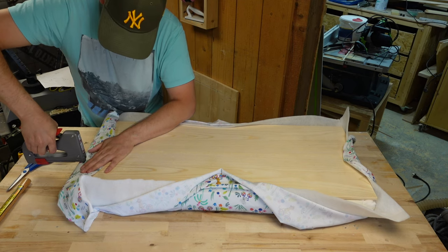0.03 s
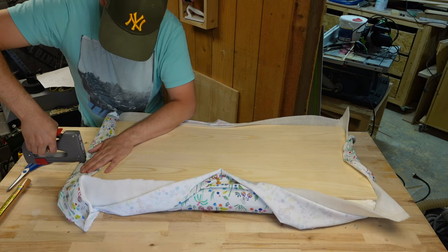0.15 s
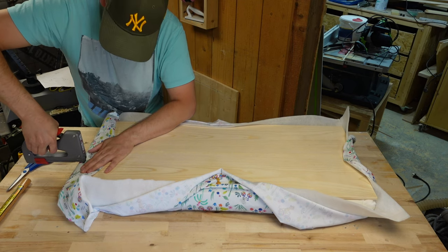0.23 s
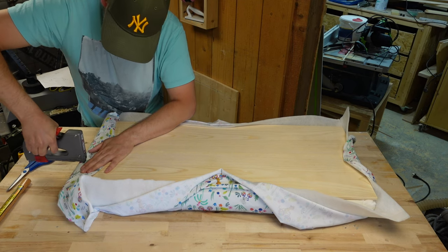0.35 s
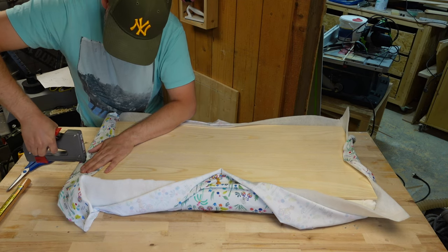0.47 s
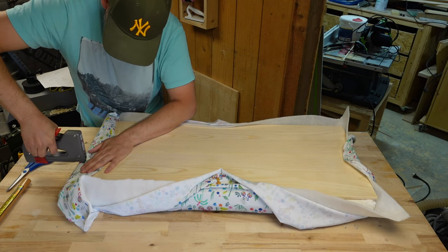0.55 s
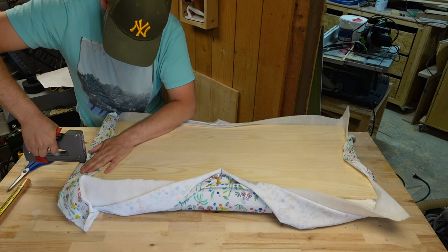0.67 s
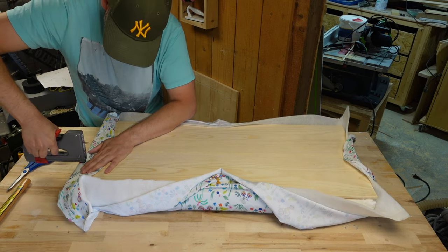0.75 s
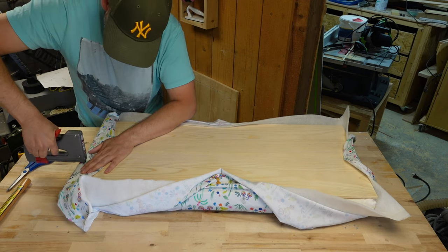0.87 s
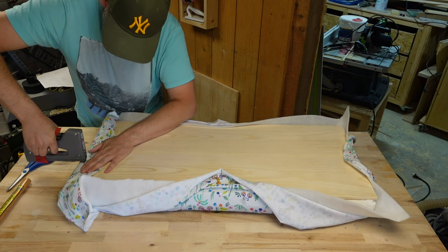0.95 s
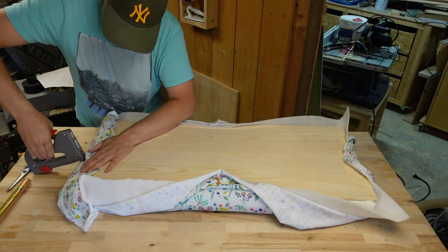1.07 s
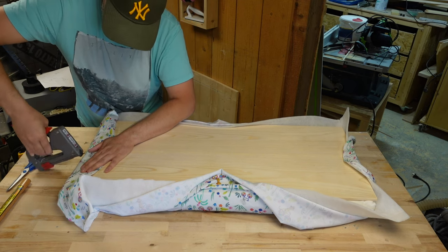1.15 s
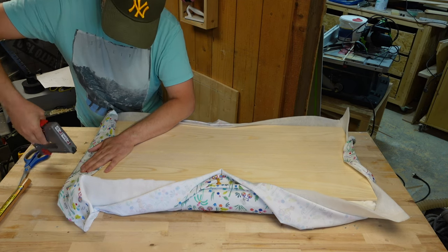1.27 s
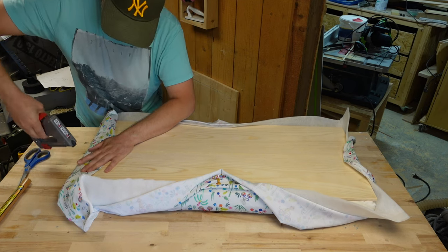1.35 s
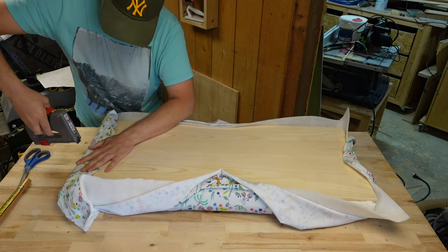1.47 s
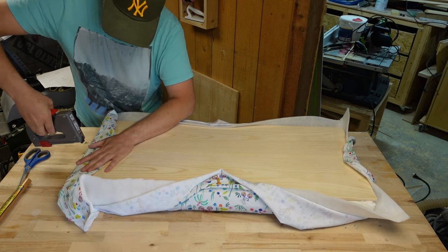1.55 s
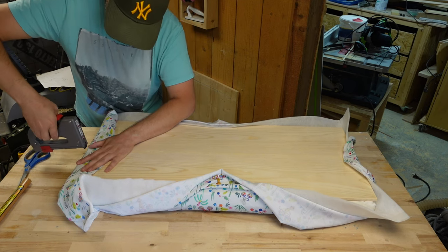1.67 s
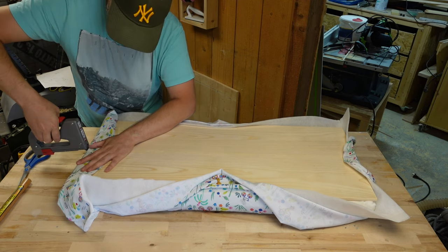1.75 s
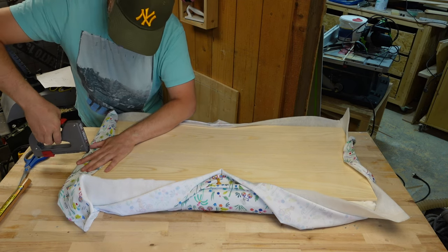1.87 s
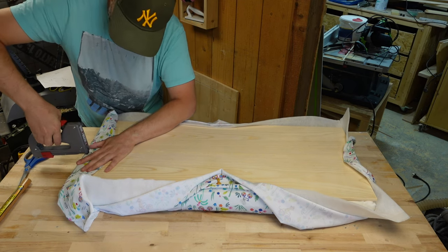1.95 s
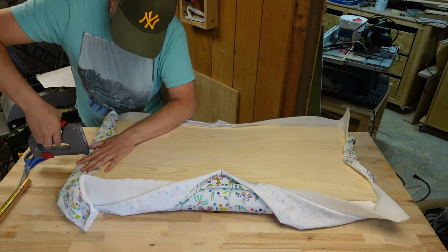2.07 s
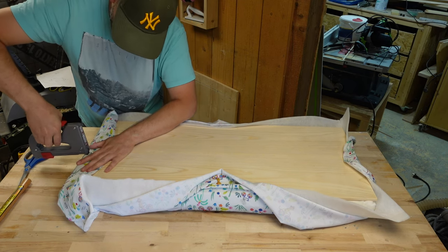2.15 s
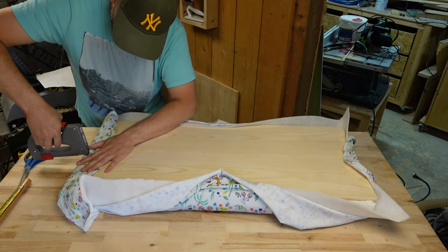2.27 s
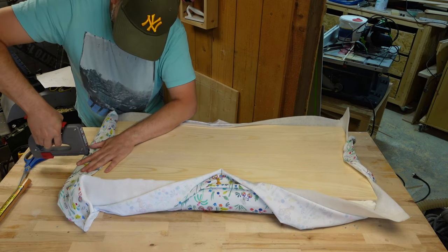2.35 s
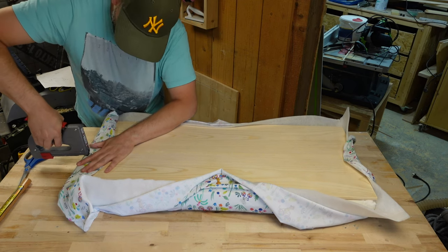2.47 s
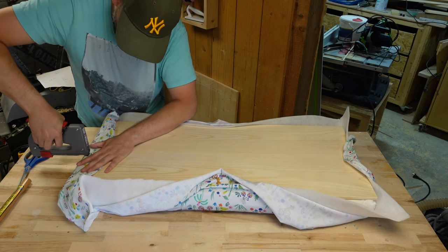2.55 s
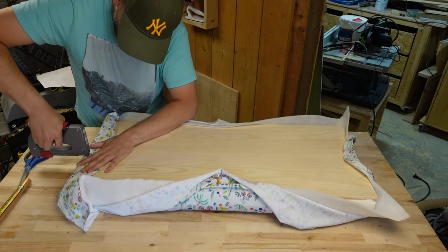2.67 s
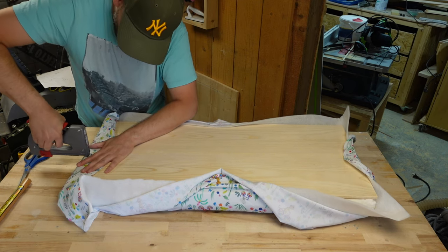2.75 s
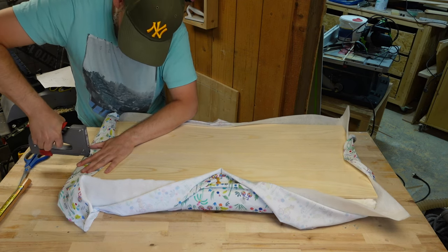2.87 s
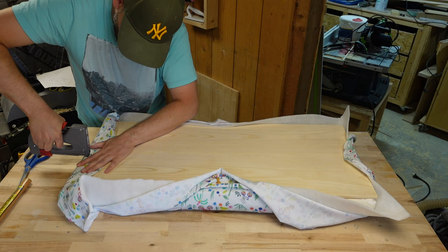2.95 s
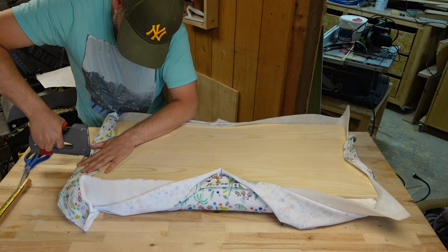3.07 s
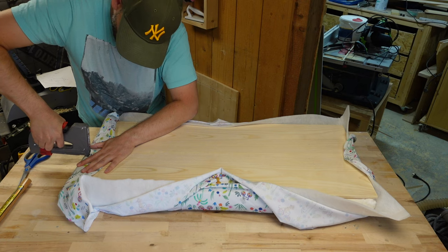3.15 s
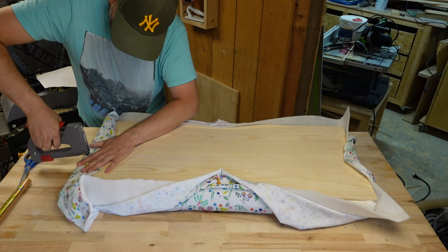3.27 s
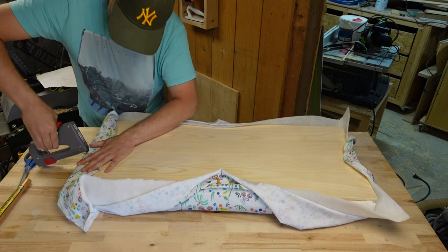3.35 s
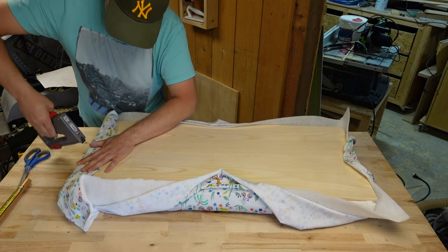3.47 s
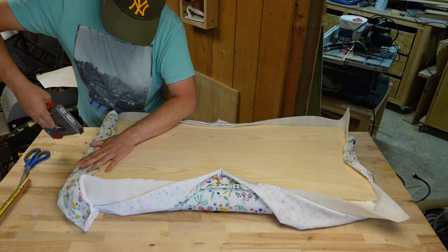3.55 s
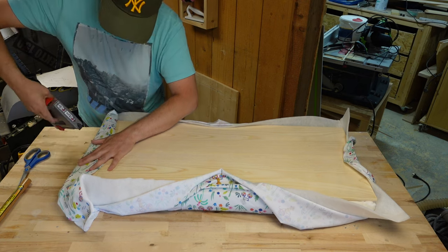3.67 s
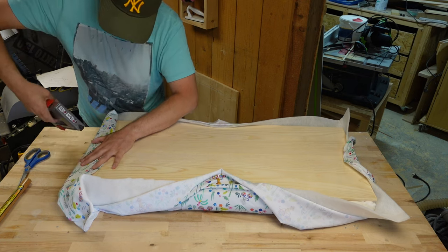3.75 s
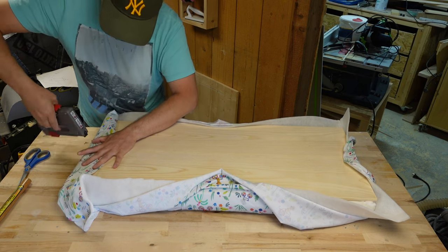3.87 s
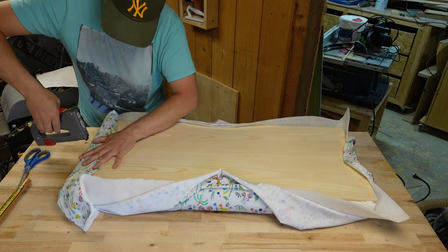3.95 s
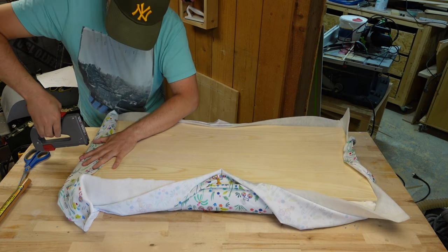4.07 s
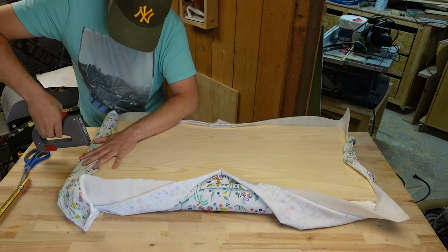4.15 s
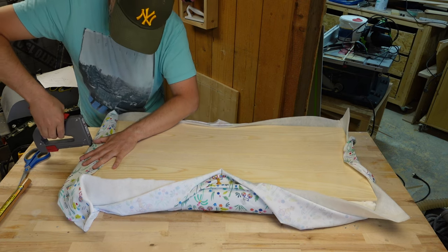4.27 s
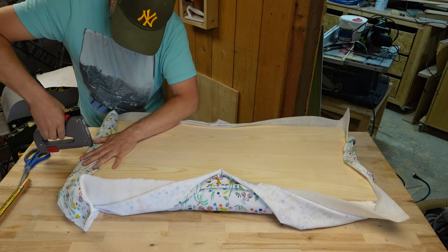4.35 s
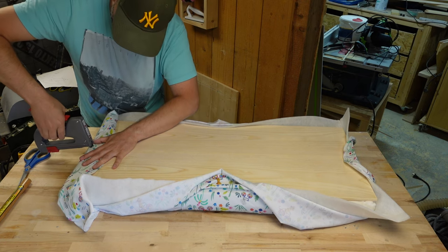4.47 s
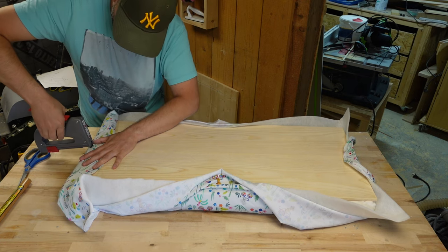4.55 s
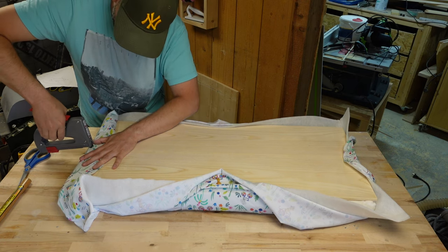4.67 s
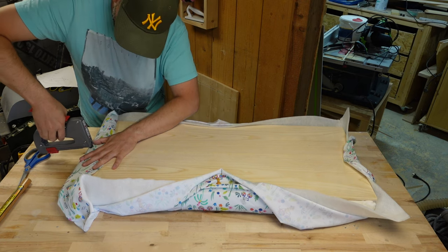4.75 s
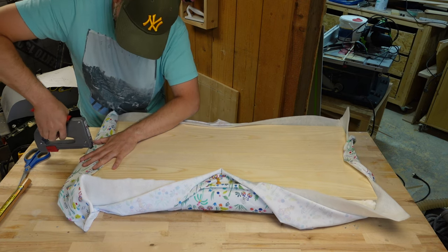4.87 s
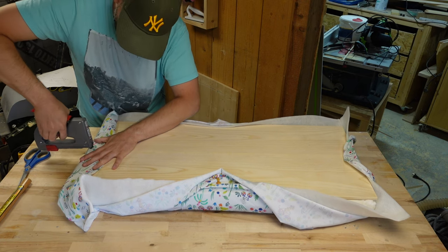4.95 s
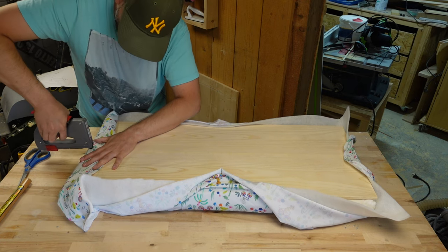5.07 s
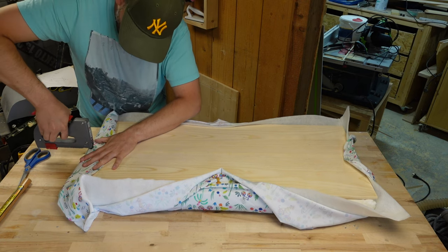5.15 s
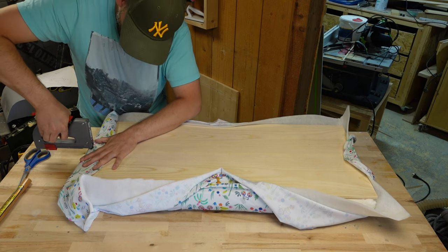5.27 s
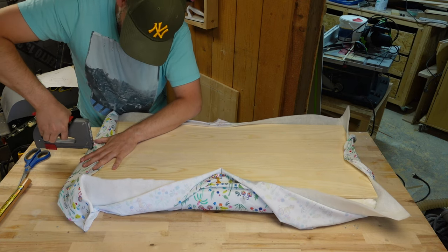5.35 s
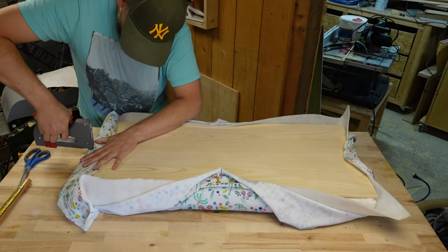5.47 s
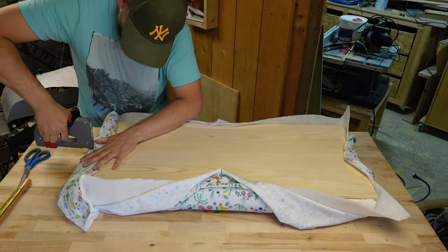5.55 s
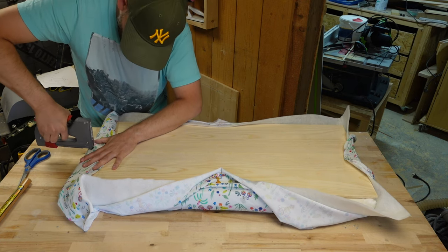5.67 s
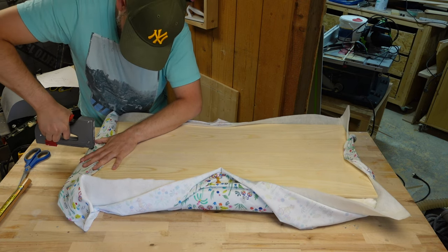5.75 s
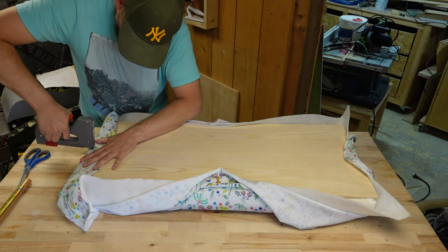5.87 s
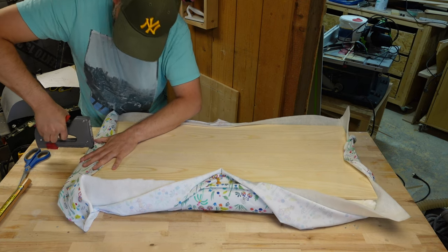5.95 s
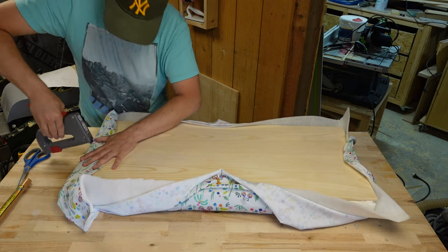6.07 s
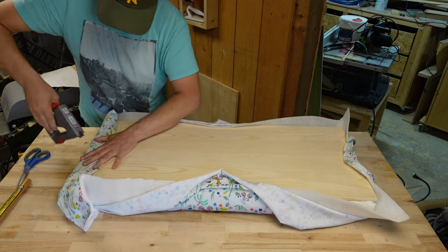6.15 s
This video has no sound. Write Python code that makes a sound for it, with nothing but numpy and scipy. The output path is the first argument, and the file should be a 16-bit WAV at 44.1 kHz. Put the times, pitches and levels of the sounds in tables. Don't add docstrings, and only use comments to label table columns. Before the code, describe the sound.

Three loud, punchy staple gun shots on a wooden board, with lever ticks, steel rattle and faint cloth rustle in a small workshop.

```python
import sys
import numpy as np
from scipy import signal
from scipy.io import wavfile
from scipy.ndimage import uniform_filter1d, minimum_filter1d

SR = 44100
rng = np.random.default_rng(int(sys.argv[2]) if len(sys.argv) > 2 else 0)


def output_pcm(signal):
    pcm = np.clip(np.atleast_2d(signal).T, -1, 1) * 32767
    wavfile.write(sys.argv[1], SR, np.round(pcm).astype(np.int16))


def how_loud(loudness_db):
    steps = np.asarray(loudness_db, float) / 20
    return 10 ** steps


N = 274302

# (frequency [Hz], left-right likeness [0-1])
ALIKE = [(100, 1), (400, 0.98), (1000, 0.93), (4000, 0.9), (14000, 0.82)]
# (frequency [Hz], level [dB per Hz])
CLOTH = [(300, -30.5), (600, -6), (1000, 2), (2200, 0.5), (4000, -2.5), (6000, -1), (9000, -9),
         (12000, -13.5), (15000, -28), (16500, -47.5)]
# (frequency [Hz], level [dB per Hz])
THUD_TONE = [(15, -65), (25, -44), (230, -3.5), (413, -7.5), (496, -15), (607, -8.5), (800, -14.5),
             (860, -10), (1050, -13), (2000, -32.5), (2600, -25.5), (4400, -120)]
# (frequency [Hz], width [Hz], level [dB])
BOARD = [(126.6, 14, 13.5), (156, 30, 5), (212, 36, 11), (313, 22, 7.5), (399.4, 17, 3), (417.8, 9.8, 1),
         (550, 90, 7.5), (613, 24, -3.5), (760, 32, 4.5), (937.6, 11, -2.5)]
# (time [s], blow [dB], change per rebound [dB], brightness [dB per octave])
LANDINGS = [
    (1.052, 8.5, -7.5, 4),
    (3.333, 0, -4.5, -2),
    (6.030, 2.5, -4, 5),
]


def evened(x):
    return x / np.sqrt(np.mean(x ** 2) + 1e-20)


def read(points, hz):
    f, value = np.transpose(points)
    return np.interp(np.log(hz + 1), np.log(f + 1), value)


def body(tone, modes, ring_db=0., tilt_db=0., size=8192):
    hz = np.abs(np.fft.fftfreq(size, 1 / SR))
    db = read(tone, hz)
    for f, width, gain_db in modes:
        db = db + max(ring_db + gain_db, 0) / (1 + (2 * (hz - f) / width) ** 2)
    db = db + tilt_db * np.log2(np.clip(hz, 500, 16000) / 3000)
    log_gain = np.maximum(db, -100) * np.log(10) / 20
    spectrum = np.exp(np.conj(signal.hilbert(log_gain)))
    response = np.fft.ifft(spectrum).real[:size // 2]
    return response / np.linalg.norm(response)


def add(mix, s, peak_db, response, rise_s, fall_s):
    t = np.arange(len(response)) / SR
    scrape = rng.standard_normal(len(t)) * (1 - np.exp(-t / rise_s)) * np.exp(-t / fall_s)
    direct = signal.fftconvolve(scrape / np.linalg.norm(scrape), response)[:len(t)]
    part = mix[:, round(s * SR):][:, :len(t)]
    part += how_loud(peak_db + 14.5) * np.array([direct, response])[:, :part.shape[1]]


def noise(tone, alike, patchy_db, size=512):
    frames, hz = 4 * N // size + 5, np.fft.rfftfreq(size, 1 / SR)
    a, b, c, d, patches = rng.standard_normal((frames, len(hz), 5)).T
    patches = uniform_filter1d(patches, size=9, axis=0)
    patches = evened(uniform_filter1d(patches, size=9, axis=1))
    same = np.clip(read(alike, hz), 0, 1)[:, None]
    left = a + 1j * b
    right = same * left + np.sqrt(1 - same ** 2) * (c + 1j * d)
    z = np.array([left, right]) * how_loud(read(tone, hz)[:, None] + patchy_db * patches)
    return evened(signal.istft(z, nperseg=size, noverlap=3 * size // 4)[1][:, :N])


def still_air():
    # (frequency [Hz], level [dB per Hz])
    air_tone = [(15, -78), (25, -21), (43, -20.5), (159, 2.5), (245, 3.5), (584, -2), (854, 2.5),
                (1150, -4), (1550, -0.5), (2530, -6.5), (13600, -25.5), (15200, -24.5), (16500, -34)]
    # (frequency [Hz], left-right likeness [0-1])
    air_alike = [(60, 0.38), (180, 0.3), (550, 0.29), (1650, 0.15), (4970, 0.36), (15000, 0.78)]
    return how_loud(-60.5) * noise(air_tone, air_alike, 1.4, size=1024)


def shop(x):
    # (frequency [Hz], reverberation time T60 [s])
    decay = [(100, 0.46), (250, 0.24), (600, 0.31), (1500, 0.24), (3000, 0.23), (6000, 0.21), (10000, .2),
             (13000, 0.17), (16000, .17)]
    builds_s = 0.0015
    white = [(20, 0), (20000, 0.01)]
    tail = noise(white, ALIKE, 3.9, size=256)[:, :SR]
    hz, t, z = signal.stft(tail, SR, nperseg=256)
    power = uniform_filter1d(abs(z[0]) ** 2, size=13, axis=0)
    z = z / np.sqrt(uniform_filter1d(power, size=5, axis=1))
    fade = how_loud(-60 * t / read(decay, hz)[:, None])
    tail = signal.istft(z * fade, SR, nperseg=256)[1][:, :SR]
    tail = tail * (1 - np.exp(-np.arange(SR) / SR / builds_s))
    return signal.fftconvolve(x[None], tail / np.linalg.norm(tail[0]), axes=1)[:, :N]


def handling():
    # (time [s], effort [dB])
    effort = [(0.0, -64), (1.3, -68), (1.44, -56.5), (1.69, -72.5), (2.0, -75.5), (2.328, -68.5),
              (2.501, -55.5), (2.6, -65), (3.01, -55), (3.6, -65), (3.66, -49.5), (3.82, -61), (4.211, -79),
              (4.85, -72), (4.98, -52.5), (5.05, -63), (5.16, -53), (5.53, -64.5)]
    # (frequency [Hz], level [dB per Hz])
    rumble_tone = [(40, -36.5), (100, -12.5), (200, 5.5), (350, 0.5), (800, -12.5)]
    slips_per_s, grain_s = 120, .0012
    busy_db, rumble_db, rumble_share = -60.5, -62, .6
    effort_db = np.interp(np.arange(N) / SR, *np.transpose(effort))
    slips = how_loud(2.5 * np.minimum(rng.exponential(1, N), 2.)) * (rng.random(N) < slips_per_s / SR)
    grain = 1.3 + signal.lfilter([1], [1, -np.exp(-1 / (grain_s * SR))], slips)
    cloth = evened(grain * noise(CLOTH, ALIKE, 3.5, size=256)) * how_loud(effort_db)
    bench_db = rumble_db + rumble_share * (effort_db - busy_db)
    return cloth + noise(rumble_tone, ALIKE, 3.0, size=2048) * how_loud(bench_db)


def foot():
    # (time [s], peak [dB], ring [Hz], fade [s])
    scuffs = [(0.298, -49, 2340, 0.017), (2.236, -62.5, 5700, 0.07), (2.328, -53.5, 2120, 0.039),
              (2.336, -60, 5770, 0.031), (2.585, -57, 5270, .05), (2.65, -60.5, 3920, 0.092),
              (2.777, -48, 5400, 0.021), (3.0135, -39, 2140, 0.0039), (5.73, -48, 2200, 0.0041),
              (5.975, -44, 1480, 0.017)]
    out = np.zeros((2, N))
    for s, db, hz, fade_s in scuffs:
        add(out, s, db + 18.5, body(CLOTH, [(hz, 0.37 * hz, 18)]), .004, fade_s)
    return out[0]


def ticks():
    # (frequency [Hz], level [dB per Hz])
    tick_tone = [(180, -47.5), (300, -35.5), (820, -18), (1110, -3), (1930, -5.5), (2440, -1.5), (3470, -6),
                 (5830, -6.5), (13500, -26), (16500, -42.5)]
    # (frequency [Hz], level [dB per Hz])
    knock_tone = [(25, -25), (60, -8), (120, -6), (230, -2), (400, -5.5), (550, -1), (800, -3.5),
                  (1200, -13), (3000, -59.5)]
    # (frequency [Hz], width [Hz], level added to the ring [dB])
    spring = [(5820, 420, 0), (9100, 650, -1.5)]
    # (time [s], peak [dB], own ring [Hz], brightness [dB per octave])
    spring_ticks = [(0.0743, -32.5, 2870, 3), (0.3739, -26.5, 3150, 6.5), (0.9745, -33, 1790, 2.5),
                    (2.844, -27.5, 2052, 5), (4.857, -47.5, 1458, 2.5), (5.2133, -26.5, 2440, 4),
                    (5.3222, -31.5, 2650, 4.5), (5.4312, -31, 2410, 5.5), (5.4972, -24, 2860, -1.5),
                    (5.6959, -23, 2980, 7)]
    # (time [s], peak [dB], ring [Hz], brightness [dB/octave])
    dry_ticks = [(0.0462, -25.5, 2900, 2.5), (0.335, -32, 2300, 5.5), (.471, -44.5, 3192, 15),
                 (0.4783, -41, 3220, 7.5), (0.7195, -16, 3100, 2.5), (.6114, -50.5, 1500, 11),
                 (.742, -33, 3110, -2.5), (1.1644, -29, 2890, 6), (1.481, -31.5, 1900, 3),
                 (2.351, -51, 2190, -15), (2.419, -49, 3000, 15), (2.599, -51, 3000, 13),
                 (2.62, -49, 3000, 7), (2.72, -51, 2400, 5), (2.812, -30.5, 2840, 6.5),
                 (3.0168, -12.5, 2175, 2.5), (3.6122, -37.5, 1630, -2), (4.4001, -43.5, 1840, 1.5),
                 (4.8886, -45, 2305, 0.5), (5.081, -47, 2380, 6), (5.0974, -44, 1410, 9),
                 (5.1118, -44, 2330, 0), (5.1341, -24, 2540, 2), (5.4866, -37, 1850, -2.5),
                 (5.5242, -31, 2400, 8.5), (5.7378, -12, 2060, 4), (5.9869, -23.5, 2480, -1.5)]
    # (time [s], peak [dB], own ring [Hz], brightness [dB per octave])
    bumps = [(0.3045, -28, 2700, 2), (0.51, -43.5, 1910, 15), (1.1961, -11, 2080, -0.5),
             (1.2673, -19, 2400, -2), (1.4745, -30, 1470, 7), (1.9852, -39.5, 1980, 2.5),
             (2.5377, -30, 2360, -1), (2.7886, -28, 2250, 0.5), (2.9763, -47, 1550, 0),
             (3.6341, -31, 1900, 3.5)]
    out = np.zeros((2, N))
    # (events, spring ring [dB], bench knock [dB])
    for events, spring_db, knock_db in [(spring_ticks, 15, -21), (dry_ticks, 0.1, -23.5), (bumps, 4, -10.5)]:
        for s, db, hz, tilt_db in events:
            strain = rng.uniform(.985, 1.015)
            modes = [(hz, 330, 8.5 - spring_db)] + [(f * strain, w, g) for f, w, g in spring]
            add(out, s - .0008, db + 3.0, body(tick_tone, modes, spring_db, tilt_db), .0006, .002)
            add(out, s, db + knock_db, body(knock_tone, BOARD), .001, .002)
    return out


def board():
    # (time [s], blow [dB], brightness [dB per octave], boom
    # [Hz])
    further_thuds = [(1.066, 1.5, -0.5, 550), (1.132, -8, 0, 300), (1.268, -19.5, 9, 700), (6.088, -10, -4.5, 1090),
                     (6.100, -16, 1.1, 1030), (6.115, -9, -4, 300)]
    rebounds, rebound_s, shrink = 4, .021, .99
    landing_hz, rebound_hz = 325, 256
    out, thuds = np.zeros((2, N)), list(further_thuds)
    for land_s, db, loss_db, tilt_db in LANDINGS:
        for k in range(rebounds):
            boom_hz = rebound_hz if k else landing_hz
            thuds.append((land_s + k * rebound_s * shrink ** k, db + k * loss_db, tilt_db, boom_hz))
    for s, db, tilt_db, hz in thuds:
        modes = [(hz, 0.45 * hz, 4)] + BOARD
        add(out, s, db, body(THUD_TONE, modes, tilt_db=tilt_db), .0005, .0012)
    return out


def blade():
    # (frequency [Hz], level [dB per Hz])
    strike_tone = [(120, -32.5), (200, -24), (876, -18), (1420, -2), (2290, -2.5), (2860, -8), (5450, -8),
                   (8330, -13.5), (12700, -15.5), (15300, -26), (16500, -10)]
    # (frequency [Hz], width [Hz], level added to the ring [dB])
    blade_modes = [(7434, 320, -2), (9600, 220, -10.5)]
    # (time [s], first tick [dB], slam delay [s], slam [dB])
    releases = [(1.0267, -11.5, .0035, 11), (3.2884, -18, .005, 4.5), (6.000, -6, 0.0077, 1)]
    # (time [s], blow [dB], blade ring [dB], brightness [dB per octave])
    chatter = [(1.040, 4, -4, 2), (1.087, 3, 20.5, 8), (3.301, 1.5, -9, 4), (3.316, 0, 18, 7.5),
               (6.021, -1.5, 18, 5.5), (6.089, -4, -2, -4.5)]
    strikes = list(chatter)
    for s, db, after_s, slam_db in releases:
        strikes.append((s, db, 3, 1))
        strikes.append((s + after_s, slam_db, -6, -0.5))
    for landing in LANDINGS:
        strikes.append((landing[0], 5.5, 12.5, 3.5))
    out = np.zeros((2, N))
    for s, db, ring_db, tilt_db in strikes:
        add(out, s, db, body(strike_tone, blade_modes, ring_db, tilt_db), .0008, .004)
    return out


def latch():
    # (time [s], blow [dB])
    snaps = [
        (0.7512, 27.5),
        (3.0305, 27.5),
        (5.7545, 27.5),
    ]
    # (frequency [Hz], level [dB per Hz])
    snap_tone = [(24, -58), (40, -52.5), (134, -44.5), (341, -12), (782, -19), (1330, -6), (2970, -3.5),
                 (3830, -8.5), (5870, -11), (7180, -14), (13500, -18), (15300, -22.5), (16500, -43)]
    # (frequency [Hz], width [Hz], level [dB])
    housing = [(1602, 160, 5.5), (1773, 41, 5.5), (2110, 270, 7), (2650, 140, 0.5), (2870, 170, 4.5),
               (4800, 750, 5.5), (5810, 330, 5.5)]
    out = np.zeros((2, N))
    for s, db in snaps:
        add(out, s, db, body(snap_tone, housing), .0004, .004)
        add(out, s + 0.0017, db - 39.5, body(THUD_TONE, BOARD), .001, .003)
    return out


def scene():
    steel, steel_spread = ticks() + latch() + blade()
    wood, wood_spread = board()
    echo = shop(how_loud(-2.0) * steel_spread + how_loud(-0.5) * wood_spread)
    balance = how_loud(np.array([[-.2], [.2]]))
    return (steel + wood + foot()) * balance + echo + handling() + still_air()


def roll_off(x):
    return signal.sosfilt(signal.butter(12, 16970, fs=SR, output="sos"), x)


def record(dry):
    late_s = .0055
    power = signal.lfilter([.008], [1, .008 - 1], (dry ** 2).mean(0))
    power_db = 10 * np.log10(abs(power) + 1e-12)
    falls_db = np.outer([260., 600.], np.arange(N) / SR)
    slow_db, fast_db = [np.maximum.accumulate(power_db + fall) - fall for fall in falls_db]
    over_db = np.maximum((1 - .45) * slow_db + 0.6 * fast_db + 10.5, 0)
    over_db = uniform_filter1d(over_db, size=89)
    over_db = np.interp(np.arange(N) - late_s * SR, np.arange(N), over_db)
    ducked = dry / how_loud(over_db)
    headroom_db = np.minimum(-4.0 - 20 * np.log10(abs(ducked).max(0) + 1e-9), 0)
    limited = ducked * how_loud(uniform_filter1d(minimum_filter1d(headroom_db, size=45), size=45))
    cut = signal.sosfilt(signal.butter(4, 66, "highpass", fs=SR, output="sos"), limited)
    low = signal.firwin(255, 15800, window=("kaiser", 4), fs=SR)
    return roll_off(signal.oaconvolve(cut, low[None], "same"))


dry = scene()
out = record(dry)
output_pcm(out)
```